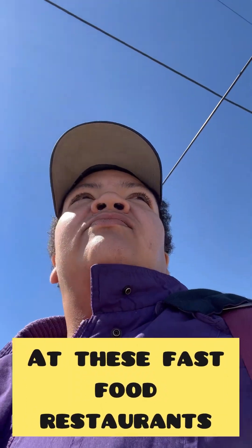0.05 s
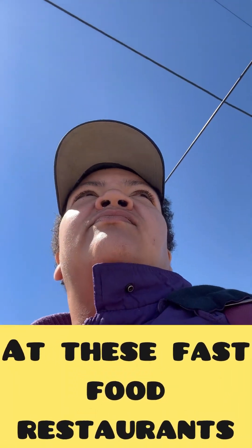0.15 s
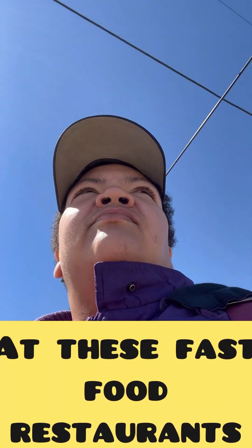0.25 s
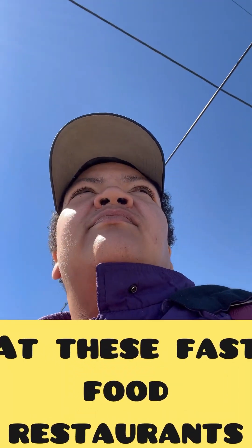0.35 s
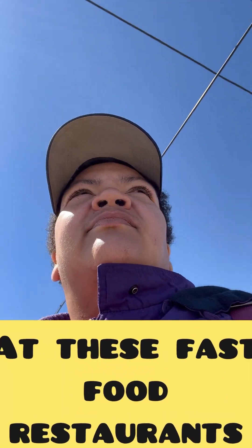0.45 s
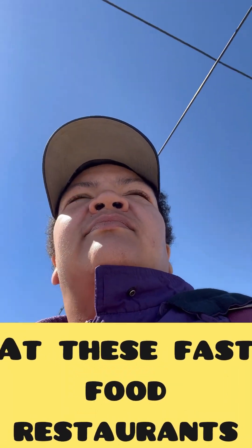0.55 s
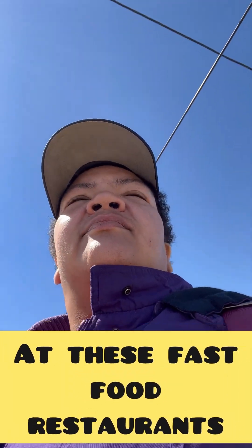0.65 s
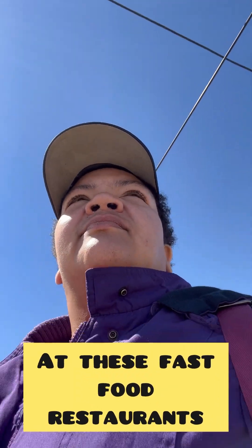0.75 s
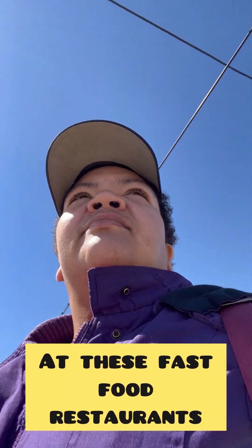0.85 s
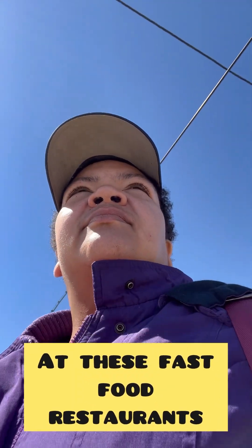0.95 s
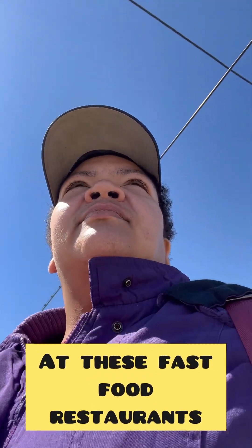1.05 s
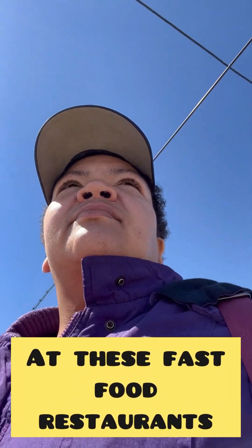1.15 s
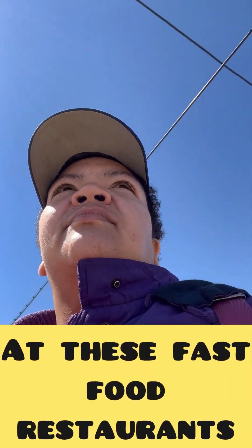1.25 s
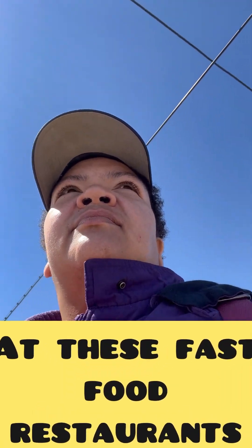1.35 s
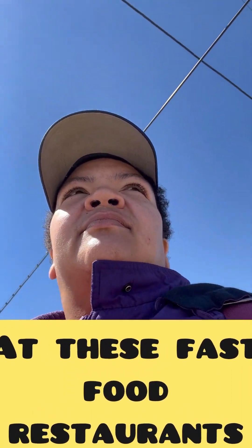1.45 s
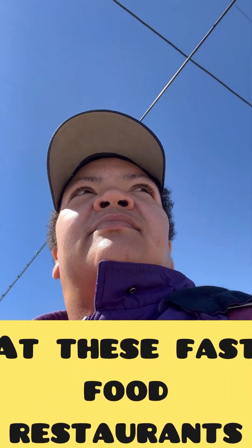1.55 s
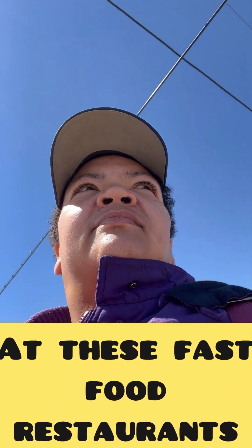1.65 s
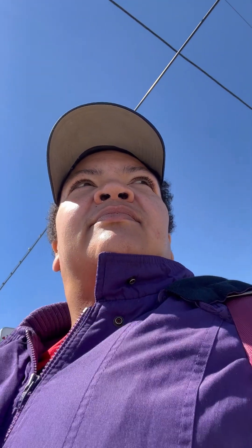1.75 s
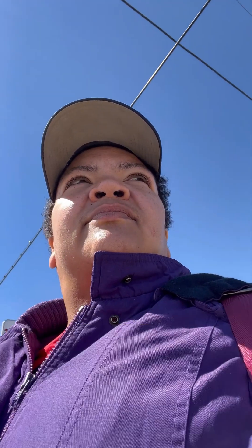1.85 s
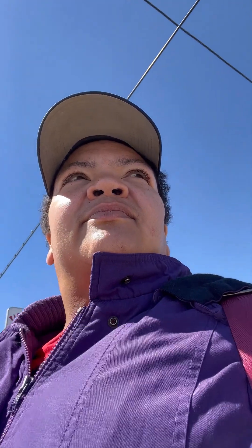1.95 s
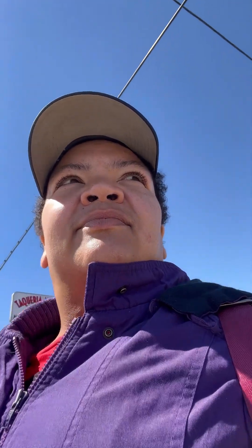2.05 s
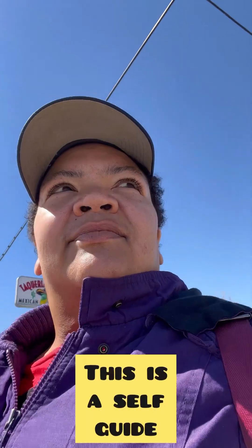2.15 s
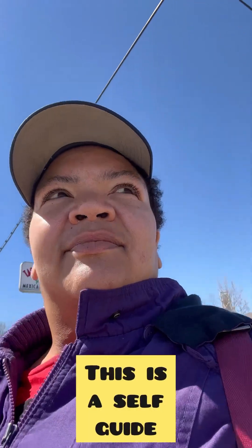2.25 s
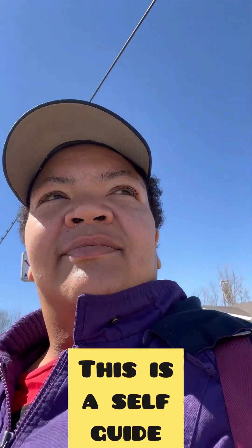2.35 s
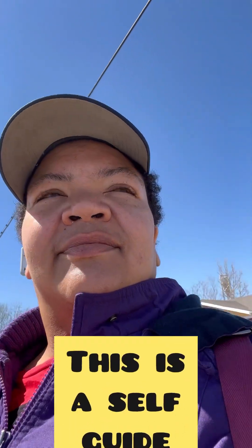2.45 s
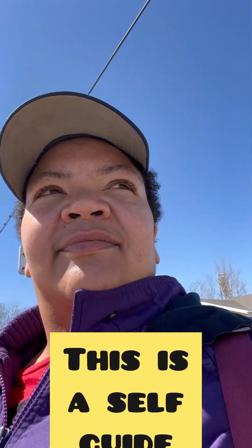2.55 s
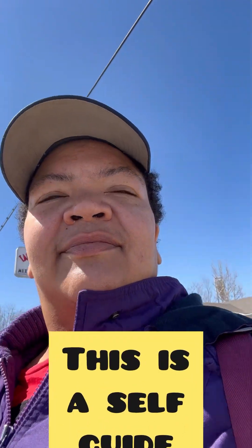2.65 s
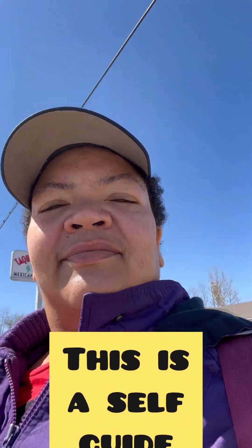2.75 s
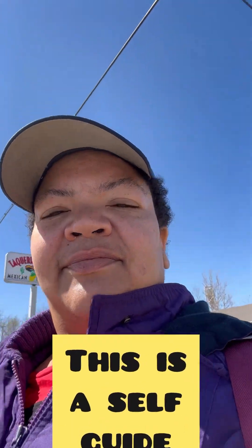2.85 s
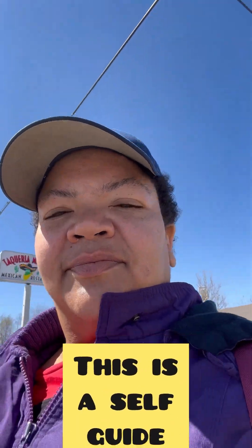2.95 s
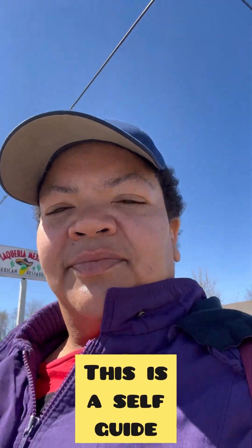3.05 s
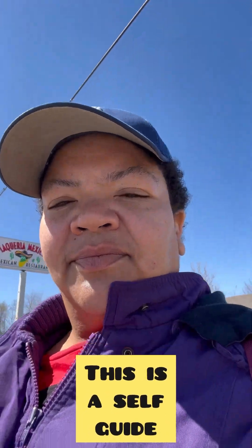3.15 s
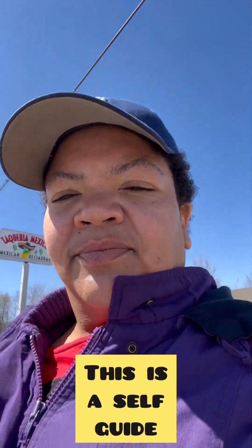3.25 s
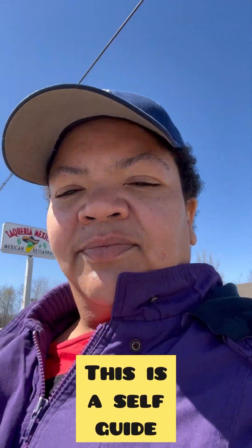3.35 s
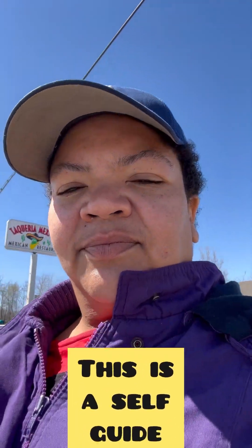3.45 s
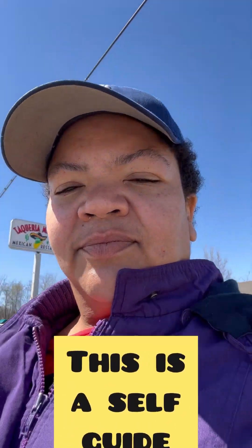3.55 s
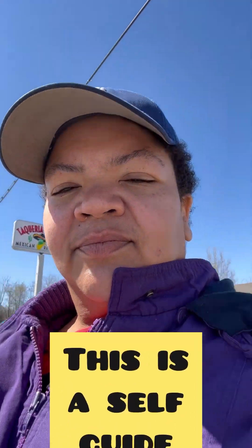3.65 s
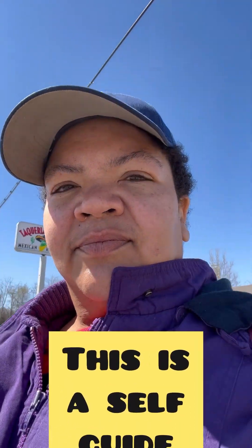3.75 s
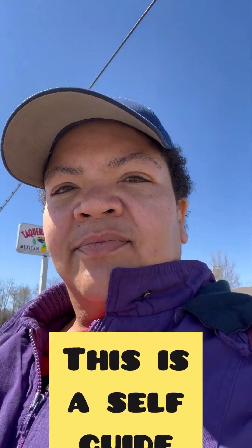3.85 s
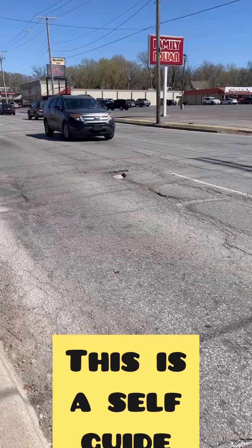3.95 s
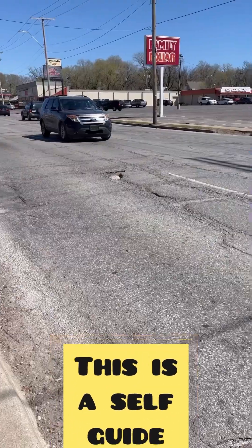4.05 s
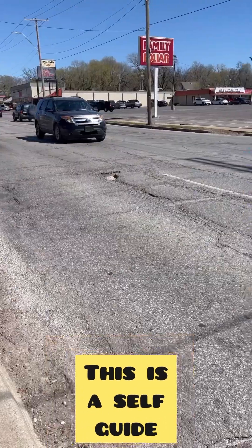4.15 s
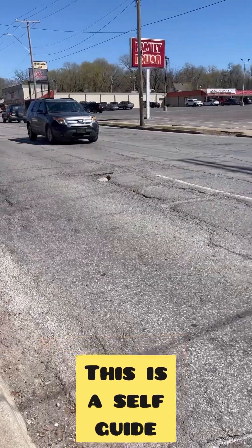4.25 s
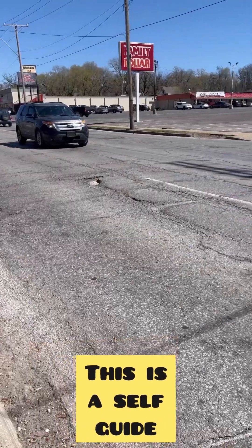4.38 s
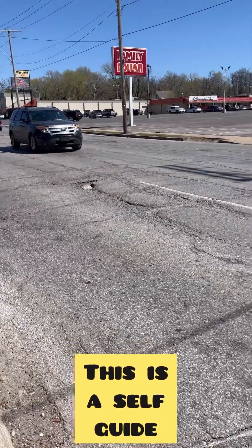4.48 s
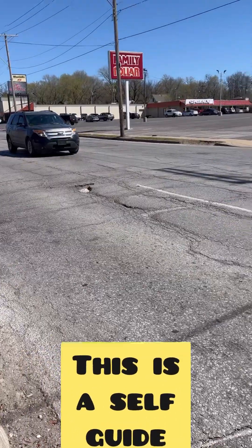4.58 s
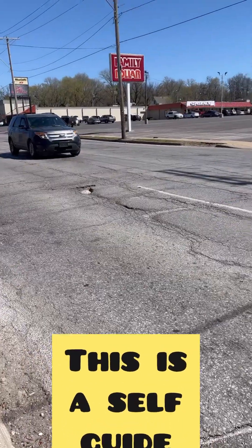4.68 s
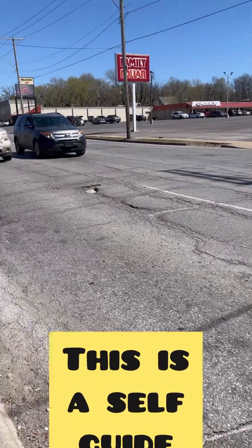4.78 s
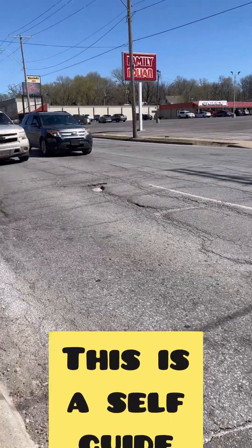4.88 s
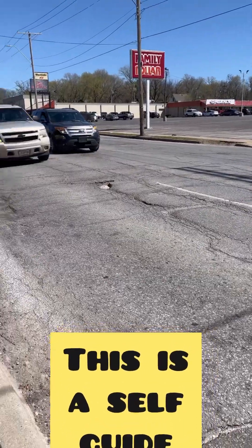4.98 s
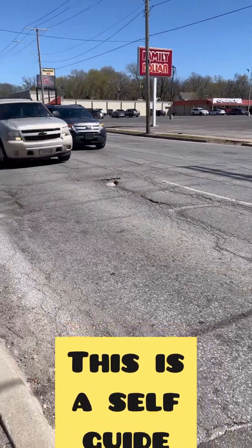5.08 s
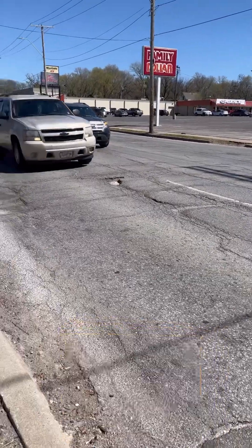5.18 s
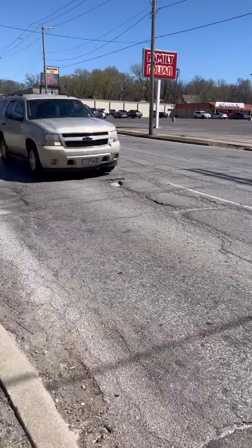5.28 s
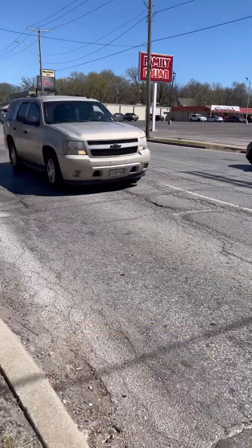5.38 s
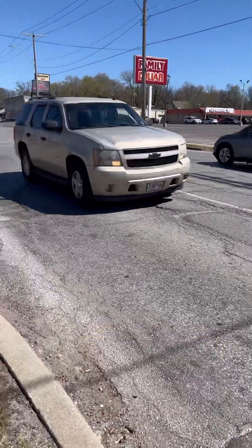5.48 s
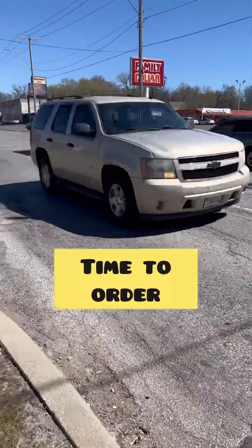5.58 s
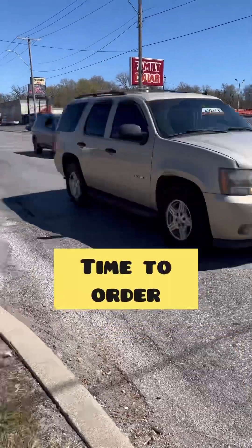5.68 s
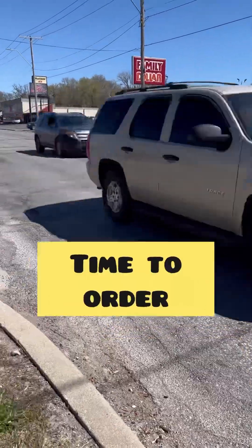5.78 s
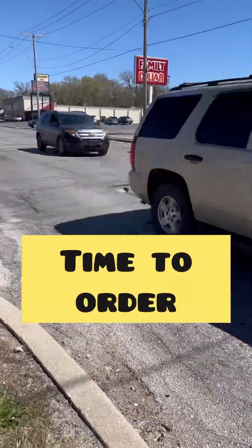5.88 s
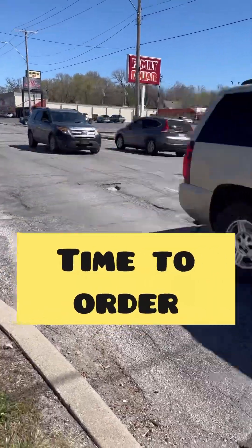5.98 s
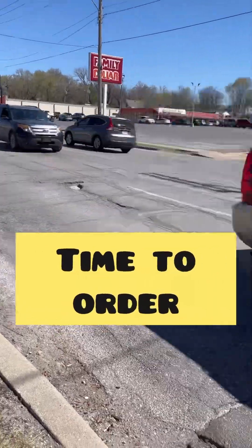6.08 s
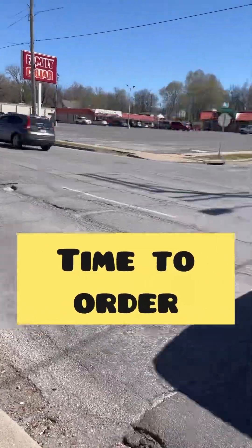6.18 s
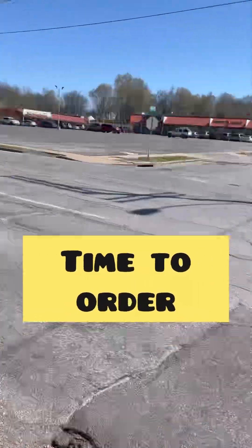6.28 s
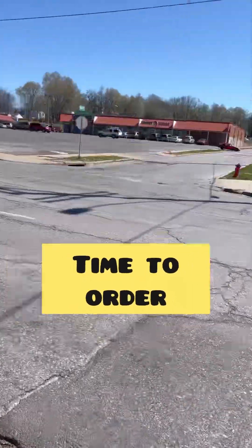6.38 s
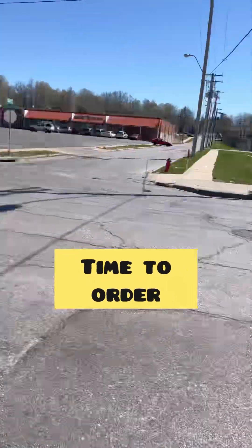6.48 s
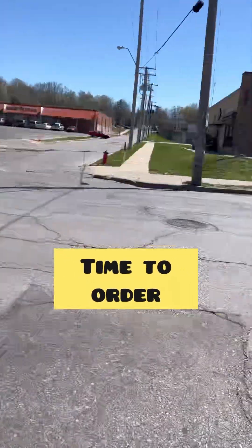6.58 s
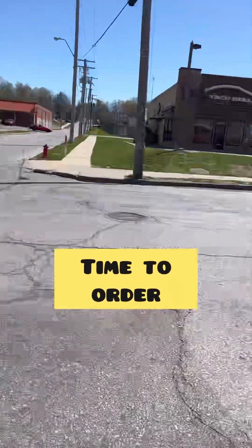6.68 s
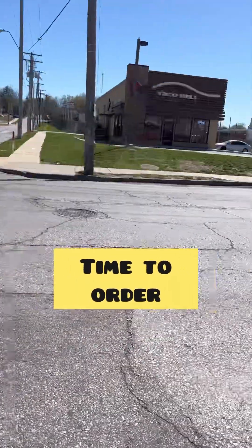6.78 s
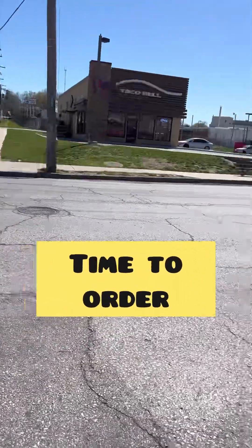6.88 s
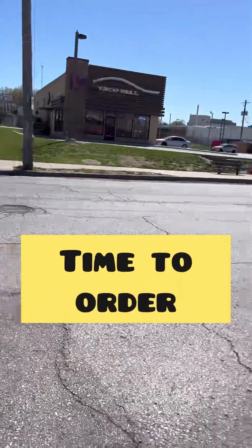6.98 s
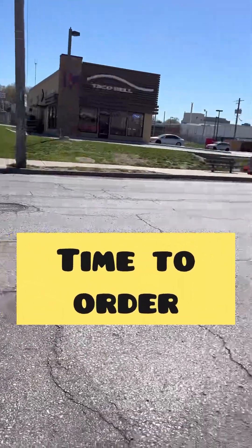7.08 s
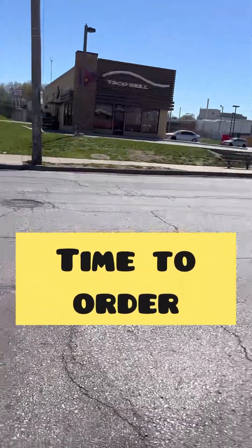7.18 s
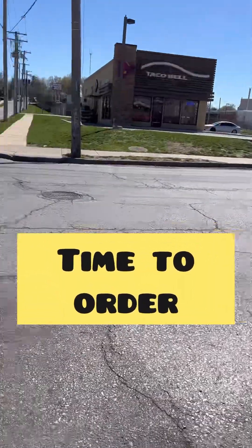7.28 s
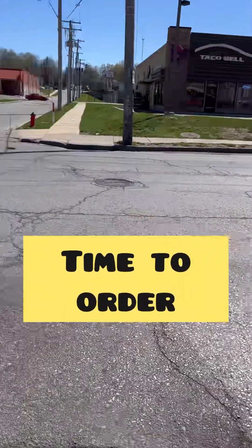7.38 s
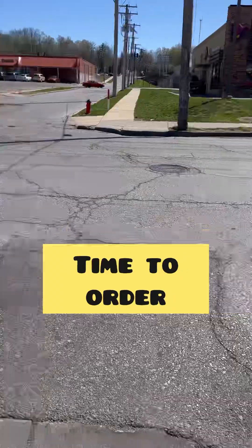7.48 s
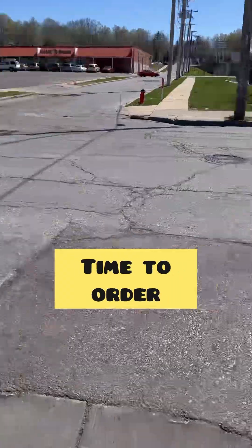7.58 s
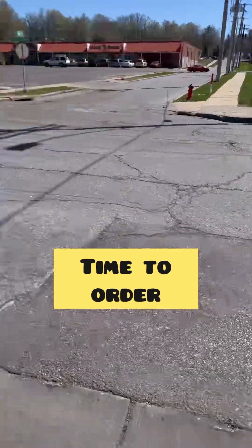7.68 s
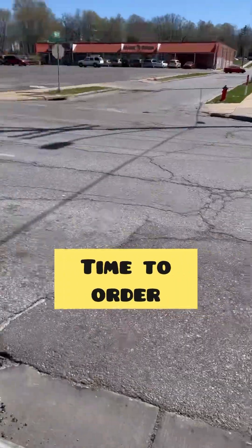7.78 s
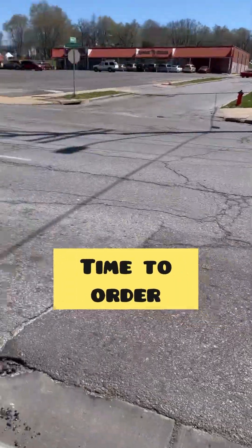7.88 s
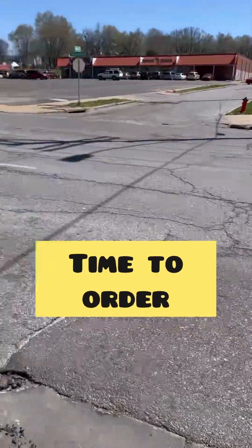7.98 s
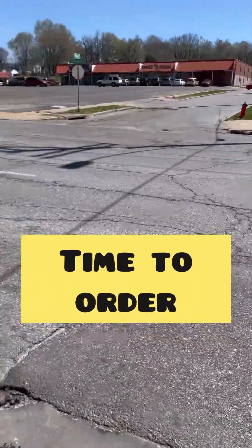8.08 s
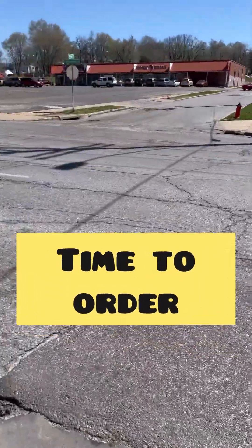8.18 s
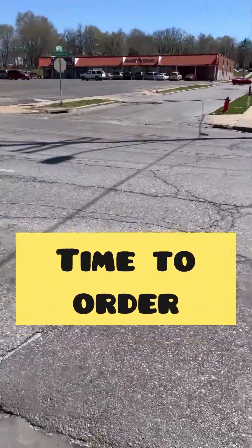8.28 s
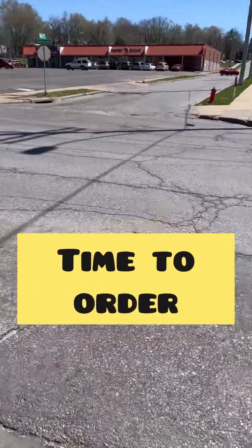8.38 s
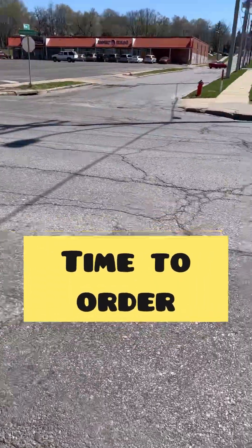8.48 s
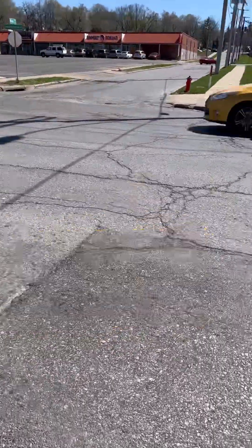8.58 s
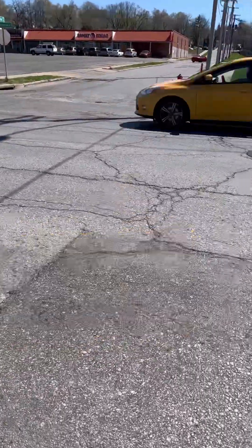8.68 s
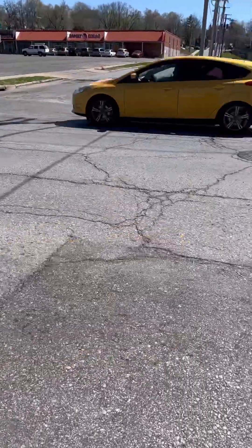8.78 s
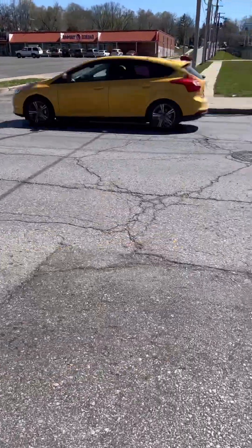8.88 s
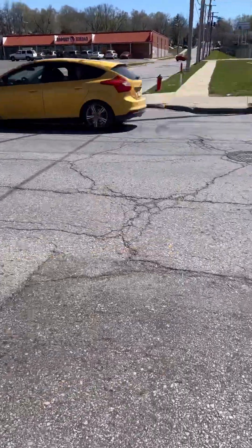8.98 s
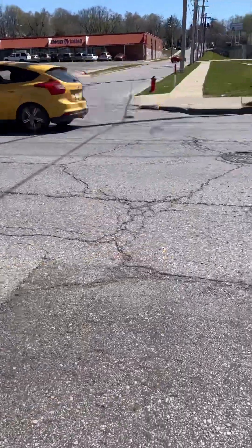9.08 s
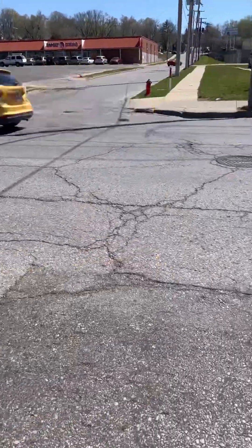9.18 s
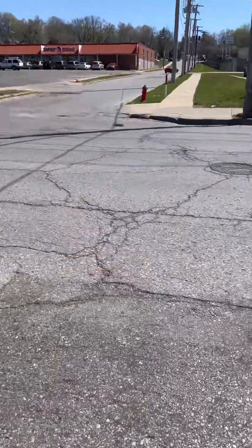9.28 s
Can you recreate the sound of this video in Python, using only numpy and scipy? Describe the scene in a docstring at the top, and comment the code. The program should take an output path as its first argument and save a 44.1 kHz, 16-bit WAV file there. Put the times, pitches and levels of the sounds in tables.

```python
"""A wide street from the kerb: road roar in shaped noise, engine drones in gliding tones, wind puffs in low noise.
First the two microphone ports are turned away from the road, while wheels knock over cracks as ringing modes.
After a brief dip at a cut they face the road, brakes squeal on thin, high tones, and wind booms low on a short tone.
Then a heavy car passes close: a boom, thumps over cracks, one more squeal, and its exhaust hums as it pulls away.
"""
import sys
import numpy as np
from scipy import signal
from scipy.fft import rfft, irfft, next_fast_len
from scipy.io import wavfile
from scipy.ndimage import uniform_filter1d, map_coordinates

SR = 44100
rng = np.random.default_rng(int(sys.argv[2]) if len(sys.argv) > 2 else 0)


def put_to_file(sound):
    """Save the sound as 16-bit audio at rate SR, in the file named by the first command-line argument."""
    columns = np.atleast_2d(sound).T  # one column per channel
    safe = np.clip(columns, -1, 1)
    whole_steps = np.round(safe * 32767)
    wavfile.write(sys.argv[1], SR, whole_steps.astype(np.int16))


N = 411453

CUT_S = 3.918  # from turned away to facing the road
TOP_HZ = 15700  # band limit

# how sound from the road reaches the two ports when they face it:
# (frequency [Hz], left over right [dB], left lead [rad], coherence [0-1])
FACING_PORTS = [(100, -.2, -.05, .99), (400, .6, -.65, .97), (600, -3, -1.4, .94), (800, -6.5, -1.05, .94),
                (1150, -5, -.75, .89), (1800, 0, 0, .98), (2100, 1.5, .1, .96), (2350, -1.5, -.1, .84),
                (2700, -5.5, -1.9, .4), (3500, -3.5, -2.9, .35), (4300, .5, -4.1, .42), (5100, -1, -5, .45),
                (6050, 0, -3.1, .85), (7000, 0, -1.4, .68), (8100, 0, 0, .85), (10300, 0, 3.1, .8),
                (12300, 0, 6.3, .75), (14600, 0, 9.4, .85)]


def amp(db):
    """Decibels to gain."""
    return 10 ** (np.asarray(db) / 20)


def rms(x):
    """Root mean square."""
    return np.sqrt(np.mean(x ** 2) + 1e-20)


def along(points, hz):
    """Each column of a table by frequency, read on a log axis."""
    f, *cols = np.transpose(points)
    return [np.interp(np.log(hz + 1), np.log(f + 1), c) for c in cols]


def curves(rows):
    """One value per sample for each column after the time."""
    s, *cols = np.transpose(rows)
    return [np.interp(np.arange(N) / SR, s, c) for c in cols]


def wobble(rate):
    """A smooth random curve, rate knots a second."""
    knots = rng.standard_normal(int(N * rate / SR) + 4)
    coarse = np.arange(0, N, 32)
    return np.interp(np.arange(N), coarse, map_coordinates(knots, [coarse * rate / SR]))


def filtered(x, response):
    """x shaped by a response given as a function of frequency."""
    size = next_fast_len(N + SR // 4, real=True)
    spectrum = rfft(x, size) * response(np.fft.rfftfreq(size, 1 / SR))
    return irfft(spectrum, size)[..., :N]


def gate(start, end, edge):
    """Open between two times, with sloping edges."""
    t = np.arange(N) / SR
    return np.clip(np.minimum(t - start, end - t) / edge, 0, 1)


def bell(x):
    """A smooth hump of height 1 at x = 0."""
    return np.exp(-x ** 2 / 2)


def swell(s, rise, fall):
    """A smooth rise to 1 at time s, and a fall."""
    since = np.arange(N) / SR - s
    return bell(since / np.where(since < 0, rise, fall))


def wind(level_db, lumpy_db):
    """Puffs push the two ports unevenly, so they are felt mostly at the sides."""
    # puffs: (time [s], width [s], level before level_db [dB])
    puffs = [(.29, 0.018, -25), (1.25, .05, -40.5), (1.72, 0.088, -35.5), (5.43, 0.085, -22),
             (5.85, .05, -34), (8.55, 0.15, -30), (9.05, 0.4, -37.5)]
    # colour of the buffeting: (frequency [Hz], relative level per Hz [dB])
    buffet = [(20, -27), (60, 10), (170, 3.5), (270, 1), (500, -28), (1500, -41), (4000, -100)]
    strength = sum(amp(db) * swell(s, width, width) for s, width, db in puffs)
    eddies = filtered(rng.standard_normal((2, N)), lambda hz: amp(along(buffet, hz)[0]))
    eddies = eddies * amp(lumpy_db * wobble(22))
    mid, side = amp(level_db) * strength * eddies / rms(eddies)
    return np.array([mid / 2 + side, mid / 2 - side])


def traffic(far_db, cars, body_db):
    """Level in dB of the five road layers: far traffic, plus each car by its distance, plus the booms."""
    # tyres throw their treble forward, so it peaks earlier; one row a layer, rumble to fizz:
    # (lead [s], falloff [power of distance])
    beams = [(.01, 1.57), (0.024, 1.34), (0.16, 1.53), (0.27, 1.25), (0.13, 2.6)]
    # car bodies booming over dips in the road: (time [s], width [s], level [dB])
    booms = [(1.62, 0.05, -33.5), (3.39, 0.1, -24), (5.88, 0.042, -28)]
    t = np.arange(0, N, 64) / SR
    lead, falloff = np.transpose(beams)[:, :, None]
    power = amp(far_db)[:, None] ** 2 + np.zeros(len(t))
    for s, width, rumble_db, roar_db, hiss_db, fizz_db in cars:
        distance = np.hypot(1, (t + lead - s) / width)  # in units of the closest approach
        closest = amp([rumble_db, roar_db + body_db, roar_db, hiss_db, fizz_db])[:, None]
        power += (closest / distance ** falloff) ** 2
    power = np.array([np.interp(np.arange(N) / SR, t, layer) for layer in power])
    power[0] += sum((amp(db) * swell(s, width, width)) ** 2 for s, width, db in booms)
    return 10 * np.log10(power)


def tread(hz, t):
    """Lift in dB of the bands that swell, glide and fade with single cars."""
    # tread bands that stand out of the roar:
    # (time of most lift [s], width [s], centre [Hz], glide [octaves/s], width [octaves], lift [dB])
    washes = [(.45, 0.45, 760, 0.13, 0.39, 2.5), (1.2, 0.48, 262, -0.94, 0.33, 4),
              (1.25, 0.24, 4140, -0.17, 0.2, 4.5), (2.1, 0.51, 1870, 0.3, 0.39, 2),
              (2.999, 0.33, 328, -0.37, 0.18, 4.5), (6.05, 0.36, 5000, 0.23, 0.2, 9.5),
              (6.45, 0.91, 379, 0.29, 0.12, 4), (6.95, 0.75, 770, 0.16, 0.24, 4),
              (6.9, 0.53, 1190, -0.12, 0.42, 3), (7, 0.58, 5000, -0.17, 0.23, 3),
              (8.7, .4, 4480, 0, 0.13, 5)]
    # hollows where the roar thins out, same columns with a negative lift
    hollows = [(.4, 0.57, 2940, 0.0087, .25, -4.5), (3.2, 0.3, 530, -.1, 0.17, -3),
               (5.4, 0.28, 496, -0.013, 0.14, -6), (6.45, 0.36, 2130, 0, 0.63, -3),
               (7.35, 0.33, 4020, 0.008, 0.73, -3.5), (8.5, .45, 182, -0.032, 0.2, -5.5)]
    lift_db = 0
    for s, length, centre_hz, glide, width, db in [*washes, *hollows]:
        octaves = np.log2((hz + 1) / centre_hz) - glide * (t - s)
        lift_db = lift_db + db * bell((t - s) / length) * bell(octaves / width)
    return lift_db


def sizzle(hz, t):
    """Lift in dB of a band of tyre hiss with a soft lower skirt and a steep upper edge, moving with the cars."""
    # (time [s], upper edge [Hz], lift [dB])
    hiss_band = [(2.1, 3500, 1), (2.3, 3750, 8), (2.58, 3850, 7), (2.75, 3900, 12), (2.9, 3300, 9),
                 (3.07, 2850, 6), (3.3, 2650, 4.5), (3.9, 3000, 6.5), (4.2, 3000, 1), (5.5, 3500, 0),
                 (6.1, 3650, 3), (6.7, 3650, 4.5), (7.3, 3300, 0), (7.9, 2500, 4), (8.5, 2450, 5),
                 (9.3, 2350, 4)]
    skirt_octaves, edge_octaves = .3, .09
    s, edge_hz, lift_db = np.transpose(hiss_band)
    octaves = np.log2((hz + 1) / np.interp(t, s, edge_hz))
    return np.interp(t, s, lift_db) * bell(octaves / np.where(octaves < 0, skirt_octaves, edge_octaves))


def rolling(ports, patchy_db):
    """Patchy noise with its tread bands, reaching the two ports from a moving direction."""
    # the roar swings across the ports as cars go by, at the band that swings most:
    # (time [s], extra left over right [dB], extra left lead [rad])
    swing = [(0, -2, -0.27), (.6, 0, -0.35), (1.35, 3.5, 0.5), (1.8, -1, 1.44), (2.2, 1, -0.55),
             (2.9, 0.5, 0.042), (3.9, 1.5, -0.56), (3.95, 3.5, 0.16), (5, -0.5, 0.23), (5.55, -1.5, 0.54),
             (6.2, 2.5, -0.3), (6.8, -1.5, 0.0097), (7.3, -1.5, 0.22), (8, -0.5, 0.16), (9.3, 1.5, 0.15)]
    swing_hz, swing_octaves = 1070, 0.79  # centre and width of that band
    hz, t, z = signal.stft(rng.standard_normal((2, N)), SR, nperseg=1024)
    hz = hz[:, None]
    # patches: a random field smoothed over frequency, then over time
    field = uniform_filter1d(rng.standard_normal(z.shape[1:]), size=12, axis=0)
    field = uniform_filter1d(field, size=5, axis=1)
    depth_db = patchy_db * hz / (hz + 500)  # shallower in the bass
    z = z * amp(depth_db * field / rms(field) + tread(hz, t) + sizzle(hz, t))
    balance_db, lead, alike = along(ports, hz)
    s, *swings = np.transpose(swing)
    swing_share = bell(np.log2((hz + 1) / swing_hz) / swing_octaves)
    swing_db, swing_lead = [np.interp(t, s, c) * swing_share for c in swings]
    # two independent noises, mixed to the wanted coherence
    turn = np.arccos(np.clip(alike, 0, 1)) / 2
    common, apart = z[0] * np.cos(turn), z[1] * np.sin(turn)
    # tip raises and advances the left port, and does the reverse to the right
    tip = amp((balance_db + swing_db) / 2) * np.exp(1j * (lead + swing_lead) / 2)
    pair = np.array([(common + apart) * tip, (common - apart) / tip])
    pair = pair / np.hypot(abs(tip), 1 / abs(tip))
    return signal.istft(pair, SR, nperseg=1024)[1][:, :N]


def road(levels_db, colour, ports, patchy_db):
    """Rolling noise: body rumble, tyre cavity, tread roar, hiss and the finest fizz of grit."""
    size = next_fast_len(N, real=True)
    hz = np.fft.rfftfreq(size, 1 / SR)
    pair = rfft(rolling(ports, patchy_db), size) * amp(along(colour, hz)[0])
    # the five layers overlap softly at their borders
    edges_hz = (25, 290, 750, 2450, 7500, SR)
    bands = np.diff([1 / (1 + (hz / edge) ** 16) for edge in edges_hz], axis=0)
    rumble_db, *tyres_db = levels_db
    # uneven asphalt shakes all the tyre noise together
    bumps_db = 0.1 * wobble(10) + 0.56 * wobble(70)
    out = np.zeros((2, N))
    for band, level_db in zip(bands, [rumble_db, *(tyres_db + bumps_db)]):
        layer = irfft(pair * band, size)[:, :N]
        out += amp(level_db) * layer / rms(layer.mean(axis=0))
    return out


def note(hz, rough, overtone_db):
    """A tone and its octave on a pitch curve, fluttering and wavering like an unevenly firing engine."""
    waver = 1.8  # slow wander against quick flutter
    phase = 2 * np.pi * np.cumsum(hz) / SR + rough * (wobble(26) + waver * wobble(7))
    tone = np.sin(phase) + amp(overtone_db) * np.sin(2 * phase)
    return (1 + rough * wobble(25)) * tone


def engines_and_wind_boom(level_db):
    """Engine and drivetrain notes of single cars, and one short low boom of wind: each swells, glides, fades."""
    # all are car notes but the row at 5.38 s, which is the boom of wind:
    # (time loudest [s], rise [s], fall [s], pitch when loudest [Hz], glide [Hz/s], level before level_db [dB])
    low_notes = [(.1, .2, 0.36, 77.3, -0.5, -28), (0.75, 0.13, 0.27, 228.9, -15.5, -29.5),
                 (1.15, 0.41, 0.23, 139.9, -1, -31), (1.65, 0.44, 0.069, 80.8, -5, -31),
                 (1.651, 0.13, 0.27, 197.3, -19.5, -26.5), (1.85, 0.077, 0.47, 67.9, 8, -26),
                 (2.85, 0.11, .55, 237, -27.5, -31), (3.5, 0.19, 0.15, 104.2, -1, -30.5),
                 (4.3, 0.32, 0.3, 98, 13.5, -30), (5.38, 0.04, 0.18, 169, -10.5, -25.5),
                 (5.8, 0.063, 0.18, 74, 57.5, -18), (6.35, 0.35, 0.33, 204, -13.5, -28),
                 (7.6, 0.18, 0.35, 103, -2.5, -30.5), (9.05, 0.21, 0.3, 95.5, -15, -31)]
    t = np.arange(N) / SR
    out = np.zeros(N)
    for s, rise, fall, hz, glide, db in low_notes:
        tone = note(hz + glide * (t - s), rough=.38, overtone_db=-18)
        out += amp(db + level_db) * swell(s, rise, fall) * tone
    return out


def brakes(level_db, rough):
    """Pads set a disc singing on one very high, unsteady note, which reaches the two ports out of step."""
    # (time [s], length [s], start pitch [Hz], end pitch [Hz], level before level_db [dB], fade [dB])
    squeals = [(4.028, 0.14, 12200, 12480, -54.5, 4), (4.277, 0.63, 13480, 13520, -56, 16),
               (6.0, .16, 10580, 10600, -52, -6)]
    out, t = np.zeros((2, N)), np.arange(N) / SR
    for s, length, start_hz, end_hz, db, fade_db in squeals:
        progress = np.clip((t - s) / length, 0, 1)
        pitch_hz = start_hz + (end_hz - start_hz) * progress
        phase = 2 * np.pi * np.cumsum(pitch_hz) / SR + rough * wobble(260)
        lead = along(FACING_PORTS, start_hz)[1]
        tone = np.sin([phase + lead / 2, phase - lead / 2])
        gain = amp(db + level_db - fade_db * progress + 6.5 * wobble(53))
        out += gain * gate(s, s + length, edge=0.013) * tone
    return out


def exhaust(level_db):
    """The heavy car's deep hum, heard once its tailpipe faces the kerb."""
    # (time [s], pitch [Hz], level before level_db [dB])
    hum = [(5.98, 56.95, -30), (6.21, 61, -22.5), (6.674, 61.9, -28), (7.1, 60.3, -37)]
    hz, db = curves(hum)
    opening = gate(hum[0][0], hum[-1][0], edge=0.054)
    return amp(db + level_db) * opening * note(hz, rough=.27, overtone_db=-15)


def rattle(t, centre_hz, octaves, t60):
    """A short dying burst of noise in one band."""
    hz = np.fft.rfftfreq(len(t), 1 / SR)
    band = bell(np.log2((hz + 1) / centre_hz) / octaves)
    noise = irfft(rfft(rng.standard_normal(len(t))) * band, len(t))
    return noise / rms(noise) * amp(-60 * t / t60)


def knocks(rattle_db):
    """A wheel drops into a crack: tyre and suspension ring and rattle briefly; loose parts tick softly."""
    # wheels striking cracks: (time [s], level [dB], ring pitch [Hz], left over right [dB])
    strikes = [(.877, -18, 900, 8), (1.613, -20, 1020, 8), (1.664, -11, 880, 10), (1.673, -21, 1250, 8),
               (3.314, -21, 1300, 6), (5.908, -8, 620, -4), (6.061, -9.3, 900, -4), (6.136, -15, 680, -3),
               (7.4905, -19.5, 950, -6)]
    # ring of a struck tyre and suspension: (multiple of the ring pitch, level [dB], t60 [s])
    wheel = [(.3, -11, .05), (.62, -6, .028), (1, 0, .02), (1.42, -4, .017), (1.85, -10, .013)]
    # light ticks and rattles: (time [s], level [dB], centre [Hz], t60 [s])
    ticks = [(3.076, -36, 2200, .06), (3.315, -32, 2000, .03), (3.327, -42.5, 4200, .07),
             (5.695, -40, 4400, .05), (7.491, -46, 2600, .04)]
    rubber_attack_s = .0011
    out, t = np.zeros((2, N + SR)), np.arange(SR // 8) / SR
    onset = 1 - np.exp(-t / rubber_attack_s)
    for s, db, hz, pan_db in strikes:
        ring = sum(amp(level - 60 * t / t60) * np.sin(2 * np.pi * hz * multiple * t)
                   for multiple, level, t60 in wheel)
        thud = ring + amp(rattle_db) * rattle(t, hz, octaves=.6, t60=.07)
        gains = amp([[db + pan_db / 2], [db - pan_db / 2]])
        out[:, round(s * SR):][:, :len(t)] += gains * thud * onset
    for s, db, hz, t60 in ticks:
        tick = rattle(t, hz, octaves=.4, t60=t60) * onset ** 2
        out[:, round(s * SR):][:, :len(t)] += amp(db) * tick
    return out[:, :N]


def scene():
    """Both stretches of road noise with the single cars, knocks, brakes and wind on top."""
    # colour of the road noise, within each layer: (frequency [Hz], relative level per Hz [dB])
    away_road = [(22, -30), (45, -5), (70, 0.5), (150, -5), (230, -4.5), (330, -14.5), (560, -14.5),
                 (900, -10.5), (1800, -15), (2200, -21.5), (3400, -29.5), (4600, -39), (6500, -40),
                 (8000, -47.5), (12000, -31), (15500, -43)]
    facing_road = [(22, -25), (45, -8.5), (65, -3), (150, -7), (220, -7), (300, -12.5), (420, -11),
                   (580, -16), (780, -11), (1700, -18), (2300, -25.5), (3000, -32.5), (5500, -46),
                   (7000, -48), (12000, -60.5), (15500, -61)]
    # the ports turned away: (frequency [Hz], left over right [dB], left lead [rad], coherence [0-1])
    away_ports = [(100, -.4, .05, .99), (350, -1.8, .6, .94), (490, -.3, 1.7, .8), (650, 9.5, 1.9, .74),
                  (950, 10, 1, .8), (1900, 8.5, .2, .75), (2080, 5.5, .8, .6), (2300, 4, 2.3, .62),
                  (3000, 1.5, 2.6, .8), (3600, 0, 2.5, .55), (4400, 4, 1.4, .3), (5800, .5, 1.05, .74),
                  (7000, 0, 1.7, .7), (8200, 0, 3, .9), (10200, 0, 3.3, .9), (12800, 0, 6.2, .7),
                  (15000, 0, 6.3, .9)]
    # far traffic, steady: rumble, tyre body, tread roar, hiss, grit fizz [dB each]
    away_far_db = [-30.5, -42.5, -34, -58.5, -75.5]
    facing_far_db = [-36, -44.5, -39.5, -56.5, -84]
    # cars going by: (time closest [s], time scale of the pass [s],
    # rumble [dB], roar [dB], hiss [dB], grit fizz [dB])
    away_cars = [(.2, 0.48, -50, -38, -49, -55), (.9, 0.8, -31, -29, -43, -59),
                 (2.4, 0.94, -32, -36.5, -50.5, -82), (3.9, 0.39, -41.5, -37, -52, -87)]
    facing_cars = [(4.8, 0.37, -27.5, -36, -50, -69), (6.1, 0.58, -24, -26.5, -46.5, -56),
                   (8.8, 1, -29.5, -39.5, -52, -64.5)]
    # body_db: the cars' tyre body against their tread roar
    away_levels = traffic(away_far_db, away_cars, body_db=-4)
    facing_levels = traffic(facing_far_db, facing_cars, body_db=-0.5)
    away = road(away_levels, away_road, away_ports, patchy_db=2.0)
    facing = road(facing_levels, facing_road, FACING_PORTS, patchy_db=1.57)
    street = np.where(np.arange(N) / SR < CUT_S, away, facing)
    gusts = wind(level_db=-3, lumpy_db=2.5)
    low_tones = engines_and_wind_boom(level_db=-.5) + exhaust(level_db=2.5)
    squeaks = brakes(level_db=-2.0, rough=1.2)
    thuds = knocks(rattle_db=-14)
    return street + gusts + low_tones + squeaks + thuds


def record(dry):
    """The level dips briefly at the cut; nothing is kept above the band limit."""
    since = np.arange(N) / SR - CUT_S
    fade = np.interp(since, [-.001, 0, .007, .02], [1, .18, .25, 1])
    return filtered(dry * fade, lambda hz: hz < TOP_HZ)


dry = scene()
out = record(dry)
put_to_file(out)
```